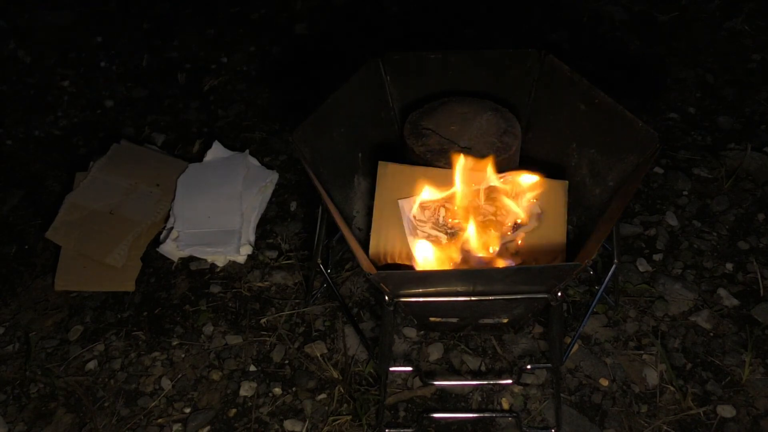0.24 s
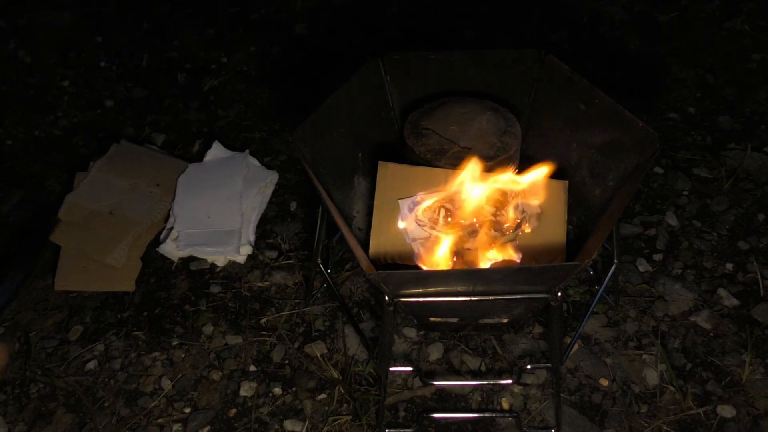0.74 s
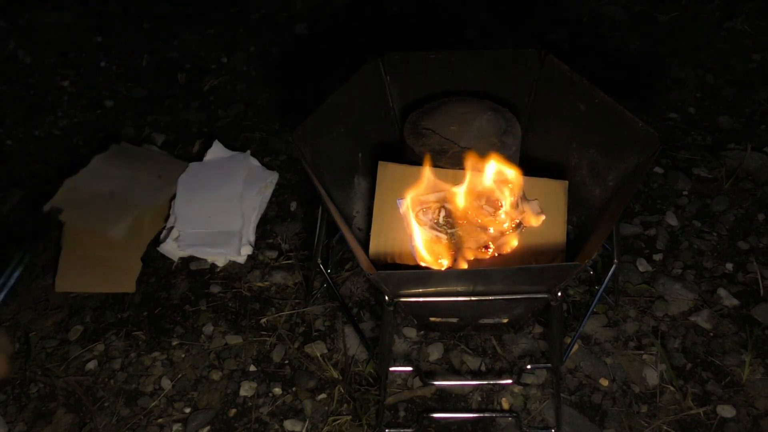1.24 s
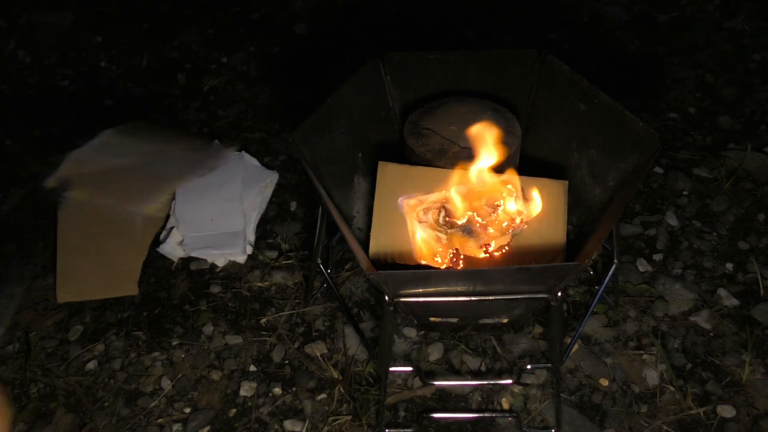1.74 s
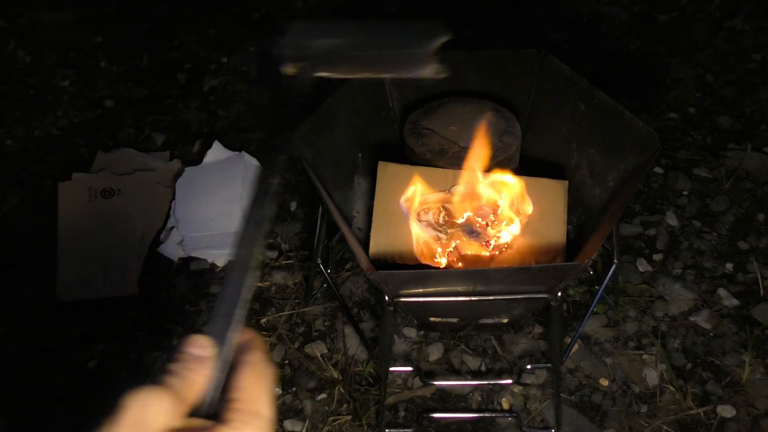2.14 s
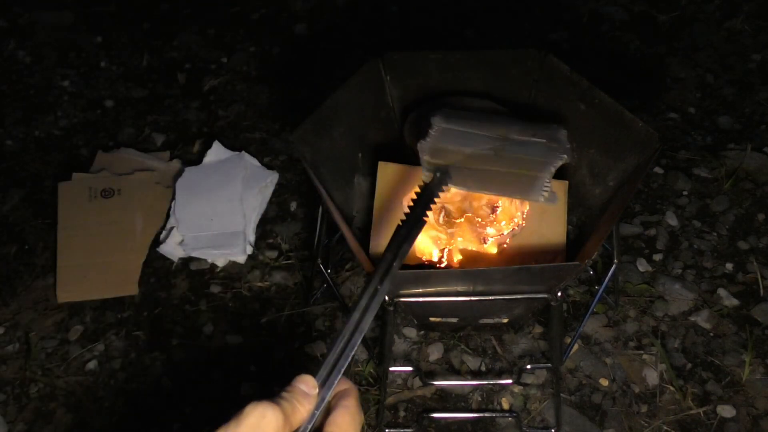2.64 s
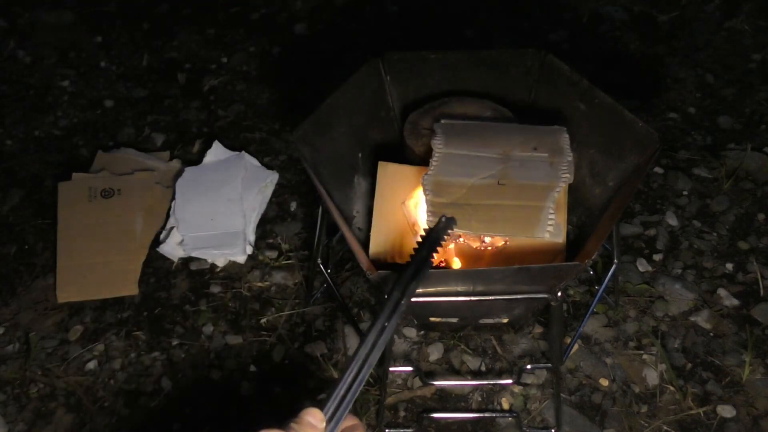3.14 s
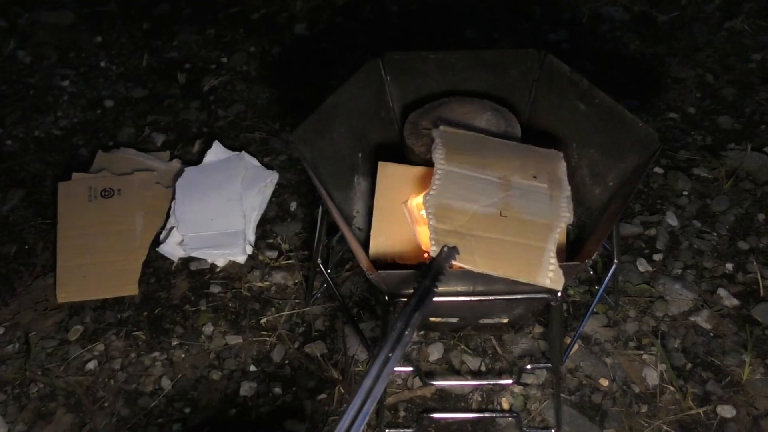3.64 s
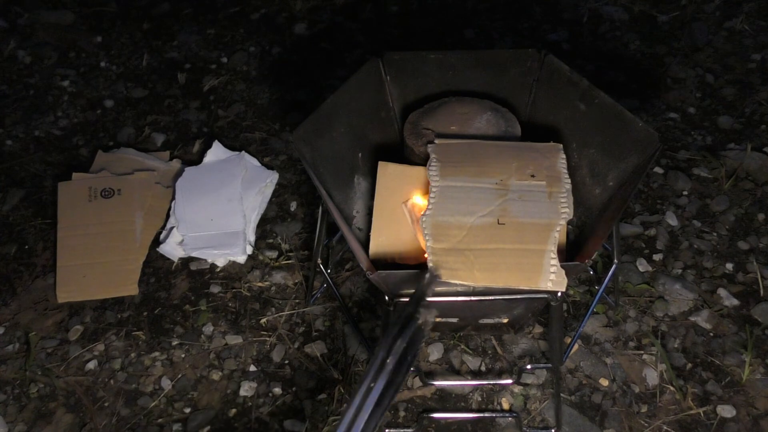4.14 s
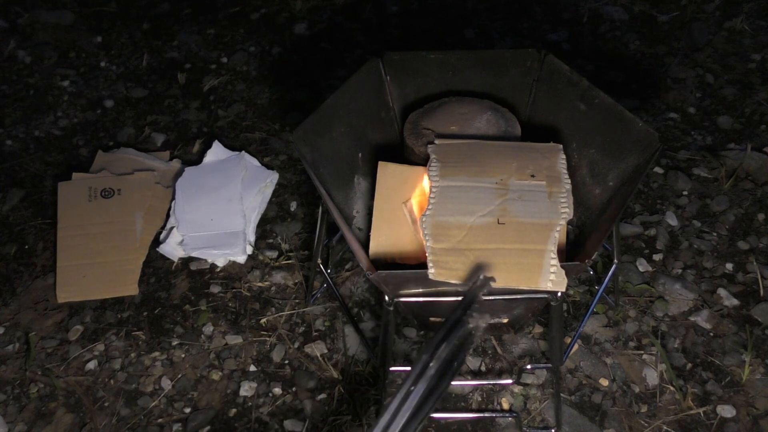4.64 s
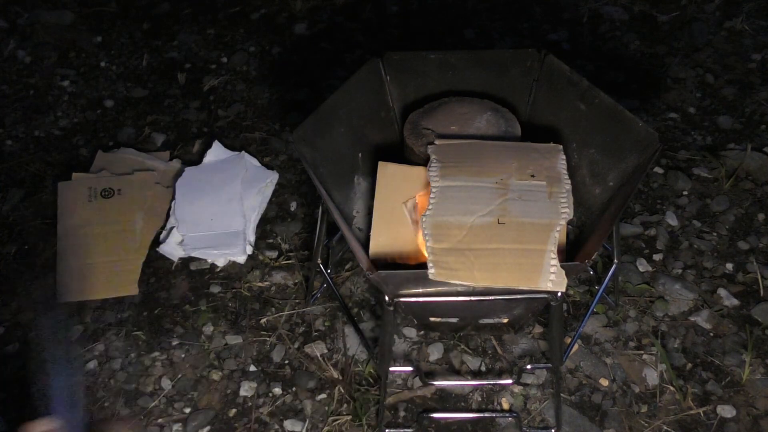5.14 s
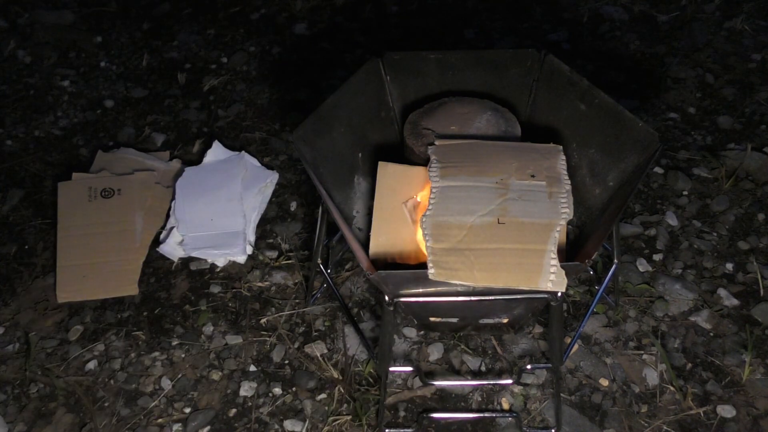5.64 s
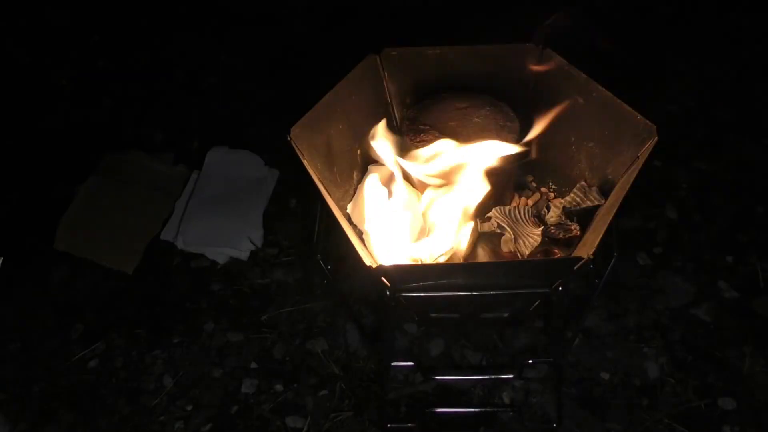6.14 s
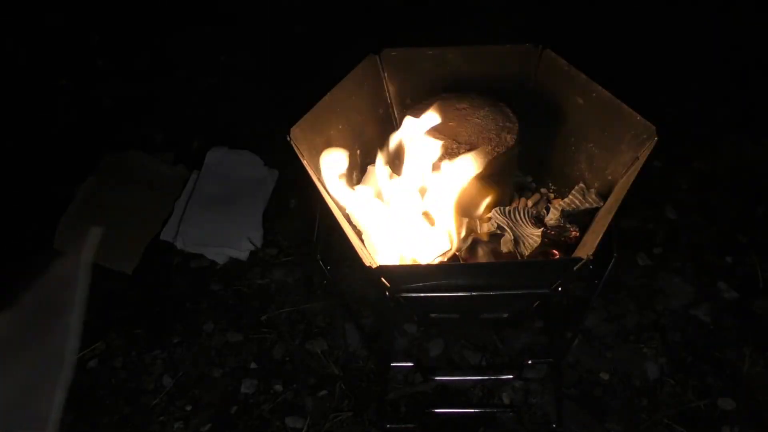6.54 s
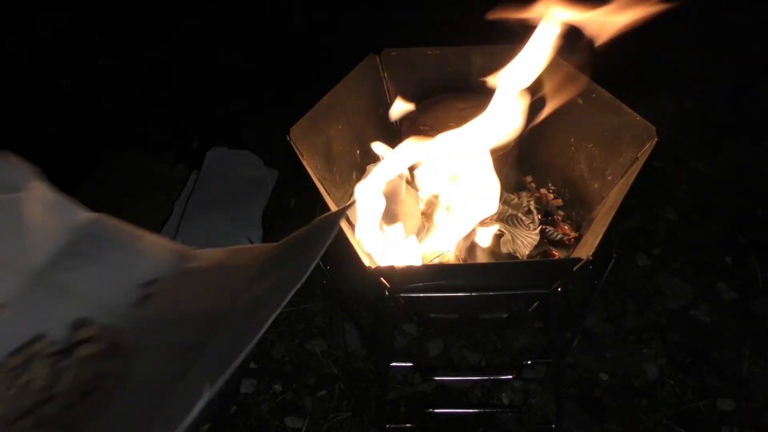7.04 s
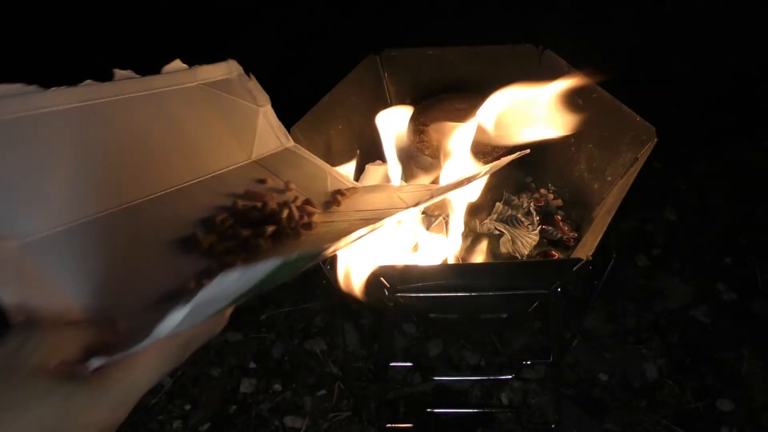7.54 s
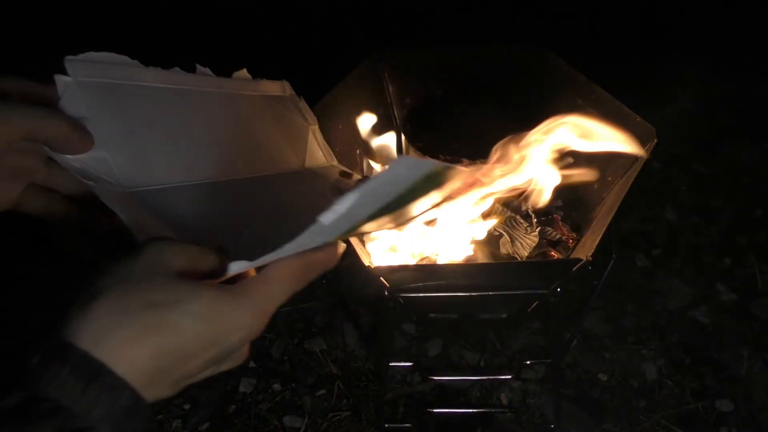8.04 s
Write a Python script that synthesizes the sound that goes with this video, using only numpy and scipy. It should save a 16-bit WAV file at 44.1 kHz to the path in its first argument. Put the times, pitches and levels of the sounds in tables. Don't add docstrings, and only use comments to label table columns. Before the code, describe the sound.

Outdoors at night, a dense, steady chorus of crickets shimmers over faint distant traffic and a low engine idle. Close by, cardboard rustles, is knocked by tongs, and steel scrapes lightly. After a tiny silent cut, a fire roars low, one cricket chirps in even phrases, and a card sheet flexes dully before pellets roll and tap off it with hard cracks and small metallic ticks. Close stereo microphones.

```python
import sys
import numpy as np
from scipy import signal
from scipy.io import wavfile
from scipy.ndimage import uniform_filter1d

SR = 44100
rng = np.random.default_rng(int(sys.argv[2]) if len(sys.argv) > 2 else 0)


def decibels_to_gain(level_db):
    exponent = np.asarray(level_db, float) / 20
    return 10 ** exponent


def log_audio(samples):
    frames = np.atleast_2d(samples).T
    limited = np.clip(frames, -1, 1)
    pcm = np.round(limited * 32767).astype(np.int16)
    wavfile.write(sys.argv[1], SR, pcm)


N = 365148
BREAK_START_S, BREAK_END_S = 6.1025, 6.1142


def evened(x):
    return x / np.sqrt(np.mean(x ** 2) + 1e-20)


def read(points, hz):
    f, value = np.transpose(points)
    return np.interp(np.log(hz + 1), np.log(f + 1), value)


def curve(rows, column=1):
    rows = np.array(rows)
    return np.interp(np.arange(N) / SR, rows[:, 0], rows[:, column])


def wander(per_s):
    knots = rng.standard_normal(400)
    return np.interp(np.arange(N) / SR * per_s, np.arange(400), knots) * np.sqrt(1.5)


def add(mix, s, sound):
    part = mix[:, round(s * SR):][:, :sound.shape[1]]
    part += sound[:, :part.shape[1]]


def resonate(x, hz, width_hz):
    turn = np.exp(2j * np.pi * np.cumsum(hz * np.ones(x.shape[-1])) / SR)
    r = np.exp(-np.pi * width_hz / SR)
    return 2 * (turn * signal.lfilter([1 - r], [1, -r], x / turn)).real


def dull(x, hz):
    sos = signal.butter(3, [170, min(hz, 20000)], "bandpass", fs=SR, output="sos")
    return signal.sosfilt(sos, x)


def ports(x, pan_db):
    x = x * np.ones((2, 1))
    right = np.append([0, 0], x[1, :-2])
    return np.array([x[0] * decibels_to_gain(pan_db / 2), right / decibels_to_gain(pan_db / 2)])


def taps(per_s, spread_db, apart):
    size = decibels_to_gain(spread_db * np.minimum(rng.exponential(1, (2, N)), 4))
    size = size * rng.choice([-1, 1], (2, N))
    clicks = size * (rng.random((2, N)) < per_s / SR) / np.sqrt(per_s)
    return clicks[0] + apart * clicks[1] * np.array([[1], [-1]])


# t/s, level/dB
ROAD_WASH = [(0.0, -52), (2.67, -52.5), (3.57, -56), (4.84, -56), (5.32, -53.5), (6.1, -57)]
# f/Hz, likeness/0-1
LIKENESS = [(60, .45), (200, .2), (600, .05), (1500, .2), (3800, .7), (4500, .72), (5200, .5), (6400, .5),
            (10000, .3), (15000, .25)]
# f/Hz, phase/rad
LEFT_LEAD = [(60, 0.), (1400, .4), (3900, .1), (4900, .7), (5500, .1), (7500, .8), (12000, 2.6),
             (15300, 4.)]
# f/Hz, level/dB
LEFT_LEAN = [(60, 0.3), (200, 0.6), (300, 0.8), (550, 3.2), (1100, 0.58), (2600, 2.1), (4500, 0.99),
             (9000, 2.6), (13000, 0.4)]


def wash(spectrum, level_db, patchy_db, road_share=0):
    frames, hz = N // 256 + 5, np.fft.rfftfreq(1024, 1 / SR)
    a, b, c, d, patches = rng.standard_normal((frames, 513, 5)).T
    patches = uniform_filter1d(patches, size=14, axis=0)
    patches = evened(uniform_filter1d(patches, size=12, axis=1))
    road_db = np.interp(np.arange(frames) * 256 / SR, *np.transpose(ROAD_WASH)) - ROAD_WASH[-1][1]
    hump = road_share * np.exp(-(np.log((hz + 1) / 1400) / 0.47) ** 2)
    same = np.clip(read(LIKENESS, hz), -1, 1)[:, None]
    lag = np.exp(-1j * read(LEFT_LEAD, hz))[:, None]
    left = a + 1j * b
    right = same * left * lag + np.sqrt(1 - same ** 2) * (c + 1j * d)
    lean = decibels_to_gain(read(LEFT_LEAN, hz) / 2)[:, None]
    shape = decibels_to_gain(read(spectrum, hz))[:, None]
    drift = decibels_to_gain(patchy_db * patches + np.outer(hump, road_db))
    z = np.array([left * lean, right / lean]) * shape * drift
    scale = np.sqrt(1.5 * np.sum(shape ** 2))
    return decibels_to_gain(level_db) * signal.istft(z, nperseg=1024, noverlap=768)[1][:, :N] / scale


def cricket(hz, effort_db):
    rate, length, pan, way = rng.random(4)
    chance = rng.standard_normal((400, 3))
    strokes_per_s = 21 + 12 * rate
    at = (np.cumsum(1 + .06 * chance[:, 0]) - rng.random()) / strokes_per_s * SR
    at = at[at < N].astype(int)
    size = decibels_to_gain(effort_db[at] + 2 * chance[:len(at), 1])[:, None]
    t = np.arange(round(min(0.015 + 0.014 * length, .027) * SR)) / SR
    turns = 2 * np.pi * hz * (t - 0.0065 * (t ** 2 / t[-1] - t)) + 10 * chance[:len(at), 2:]
    swell = np.sin(np.pi * t / t[-1]) ** 2
    lean_db = .6 + 2 * (pan - .5)
    right_lag = 0.77 + 1.9 * (way - .5)
    out = np.zeros((2, N + 2000))
    for port, lag, db in zip(out, (0, right_lag), (lean_db, -lean_db)):
        pulse = swell * np.sin(turns - lag)
        pulse += decibels_to_gain(-34.5) * swell ** 2 * np.sin(2 * (turns - lag))
        port[at[:, None] + np.arange(len(t))] = decibels_to_gain(db) * size * pulse
    return out[:, :N]


# f/Hz, level/dB
WING_PITCHES = [(3900, -38.5), (4050, -15), (4200, -6), (4330, 1.5), (4440, 0.5), (4500, 10.5), (4570, 3),
                (4680, 7.5), (4760, -2), (4830, 1.5), (4940, -6), (5010, -10.5), (5100, -9), (5250, -41.5)]
CHORUS_DB, CHORUS_LATER_DB = -28, -27
PHRASE_S, PERIOD_S, SING_S, EDGE_S, REST_DB = 6.4, .415, .18, .055, -15
SOLO_GAIN = .011


def chorus(count):
    t = np.arange(N) / SR
    later = t > BREAK_END_S
    pitches_hz = np.linspace(4120, 4980, count)
    near = sum(cricket(hz, read(WING_PITCHES, hz) + 3.2 * wander(5)) for hz in pitches_hz)
    crowd = decibels_to_gain(-1) * evened(near) + evened(wash(WING_PITCHES, 0, patchy_db=1.21))
    from_middle_s = abs((t - PHRASE_S - SING_S / 2 + PERIOD_S / 2) % PERIOD_S - PERIOD_S / 2)
    off_s = from_middle_s - SING_S / 2
    resting = np.where(t > PHRASE_S - EDGE_S, np.clip(off_s / EDGE_S, 0, 1), 1)
    solo = cricket(5130, np.where(later, REST_DB * resting, -9))
    level_db = np.where(later, CHORUS_LATER_DB, CHORUS_DB) + 0.8
    return evened(crowd) * decibels_to_gain(level_db) + SOLO_GAIN * solo


# f/Hz, density/dB per Hz
HISS_SPECTRUM = [(4900, -23), (5180, 3.5), (5320, 4), (5900, -5.5), (6850, -3.5), (7500, -8.5),
                 (8550, -14.5), (9000, -7.5), (9350, -12.5), (9480, -15), (9750, -28), (11000, -42),
                 (13300, -40), (15700, -27)]


def hiss():
    return wash(HISS_SPECTRUM, -53.5 + 0.11, patchy_db=0.98)


# f/Hz, density/dB per Hz
AIR_SPECTRUM = [(12, -43), (20, -10), (54, 0), (76, -7.5), (216, -8.5), (294, -13), (376, -7.5), (420, -15),
                (469, -15), (818, -16.5), (1190, -15), (3470, -28), (3790, -21.5), (4050, -19.5),
                (5260, -37.5), (8910, -120)]


def night_air():
    return wash(AIR_SPECTRUM, -40 + 0.033, patchy_db=0.79, road_share=1)


def engine(rows, fuzz_hz, smear, pan_db):
    hz = curve(rows)
    turns = 2 * np.pi * np.cumsum(hz) / SR
    fuzz = evened(resonate(rng.standard_normal((2, N)), hz, fuzz_hz))
    tone = decibels_to_gain(curve(rows, column=2)) * (np.sqrt(2) * np.sin(turns) + smear * fuzz)
    half = decibels_to_gain(curve(rows, column=3)) * np.sqrt(2) * np.sin(turns / 2)
    return tone * decibels_to_gain(np.array([[.5], [-.5]]) * pan_db) + half


# t/s, f/Hz, level/dB, half-order level/dB
IDLE_TONE = [(0.0, 52.89, -54.5, -76), (3.4, 53.17, -53, -83), (6.1, 51.9, -56.5, -80)]


def idle_engine():
    return engine(IDLE_TONE, fuzz_hz=6, smear=0.93, pan_db=.5)


# t of fastest moment/s, level/dB, rise/s, fall/s
MOVEMENTS = [
    (0.41, -44.5, 0.32, 1.4),
    (1.42, -44, .25, 1.5),
    (1.91, -39.5, 0.42, .9),
    (2.77, -49.5, .6, 0.34),
    (4.3, -53.5, 2.1, .2),
    (5.26, -41, .6, 0.7),
    (6.72, -37.5, 0.18, .5),
    (6.84, -33, .05, 0.11),
    (7.02, -42.5, .1, 10),
]
STILL_DB = -53.5


def rustle():
    t = np.arange(N) / SR
    fibres = taps(2500, spread_db=1.9, apart=1)
    moves = [db - 20 * np.maximum((s - t) / rise_s, (t - s) / fall_s) for s, db, rise_s, fall_s in MOVEMENTS]
    level_db = np.maximum(np.max(moves, axis=0), STILL_DB)
    crackle = evened(resonate(resonate(fibres, 2700, 2000), 3100, 1900))
    return ports(decibels_to_gain(level_db - 10) * crackle, 7.5)


def knock(db, hz, pan_db, treble_db, thump, overtones, contact_s, t60_s):
    t = np.arange(2600) / SR
    blow = rng.standard_normal(2600) * decibels_to_gain(-60 * np.maximum(t - contact_s, 0) / t60_s)
    blow[:3] += 6
    # f/Hz, width/Hz, share
    modes = [(hz, 450, 1), (1.55 * hz, 600, .65 * overtones), (2.2 * hz, 800, .45 * overtones),
             (2900, 1000, .2), (380, 350, thump)]
    body = 0
    for mode_hz, width_hz, share in modes:
        ring = resonate(resonate(blow, mode_hz, width_hz), mode_hz, 2 * width_hz)
        body = body + share * evened(ring)
    body = dull(body, 3040)
    top = resonate(resonate(blow, 6800, 2200), 6800, 2600)
    sound = decibels_to_gain(db) * body / abs(body).max() + decibels_to_gain(db + treble_db + 4) * top / abs(top).max()
    return ports(sound, pan_db)


# t/s, peak level/dB, body f/Hz, left-right level/dB
TONG_BLOWS = [
    (1.427, -26, 990, 5),
    (1.8954, -22.5, 755, 1.5),
    (1.91, -44, 740, 1),
    (1.917, -30, 646, 1),
]


def tongs(mix):
    for s, *blow in TONG_BLOWS:
        add(mix, s, knock(*blow, treble_db=-28, thump=.5, overtones=.7, contact_s=.0044, t60_s=.03))


def tick(db, hz, t60_s):
    t = np.arange(2000) / SR
    scrape = rng.standard_normal(2000) * decibels_to_gain(-60 * t / t60_s)
    ring = resonate(resonate(scrape, hz, 900), hz, 1500)
    ring += 0.42 * resonate(resonate(scrape, 7000, 3000), 7000, 3500)
    return ports(decibels_to_gain(db) * ring / abs(ring).max(), 2.6)


# t/s, peak level/dB, ring f/Hz
TONG_SCRAPES = [
    (1.893, -34.5, 8050),
    (2.6, -36, 7800),
    (2.69, -43, 7260),
    (2.76, -48.5, 7500),
    (2.852, -31.5, 5740),
    (2.86, -49, 7700),
    (3.11, -39.5, 7000),
    (3.17, -45, 7600),
    (3.51, -46, 6900),
]


def scrapes(mix):
    for s, *scrape in TONG_SCRAPES:
        add(mix, s, tick(*scrape, t60_s=.04))


# f/Hz, density/dB per Hz
BLAZE_SPECTRUM = [(12, -38), (20, -6), (43, -1), (74, -4.5), (108, -18.5), (145, 1), (173, -8), (420, -5.5),
                  (491, -13), (716, -14), (1460, -11.5), (3170, -27), (3710, -25), (4050, -14.5),
                  (5260, -48), (8910, -120)]


def blaze():
    return wash(BLAZE_SPECTRUM, -35 + 0.089, patchy_db=0.55)


# t/s, f/Hz, level/dB, half-order level/dB
PASSING_TONE = [(6.12, 145.0, -51, -50), (6.75, 144.2, -49.5, -49.5), (7.29, 143.9, -46.5, -46.5),
                (7.8, 142.5, -46.5, -59), (8.28, 139.5, -51, -58)]


def passing_engine():
    return engine(PASSING_TONE, fuzz_hz=3.2, smear=0.24, pan_db=-14.5)


# t/s, peak level/dB, body f/Hz, left-right level/dB
SHEET_FLEXES = [
    (6.274, -40, 342, 0.5),
    (6.454, -37, 433, -2.5),
    (6.541, -38, 423, -0.5),
    (6.777, -35, 377, -7),
    (6.835, -38, 369, -1.0),
    (6.93, -34, 425, -3),
    (7.015, -37, 350, -0.5),
    (7.114, -35, 347, 4),
]


def flexes(mix):
    for s, *bump in SHEET_FLEXES:
        add(mix, s, knock(*bump, treble_db=-45, thump=.3, overtones=.12, contact_s=.008, t60_s=.05))


# t/s, level/dB
FLOW = [(7.09, -44.5), (7.21, -42.5), (7.25, -35.5), (7.29, -43), (7.6, -41.5), (7.66, -32), (7.85, -31),
        (7.96, -26), (8.26, -28.5)]
# f/Hz, width/Hz, level/dB
SHEET_LOW_MODES = [(250, 990, -17.5), (458, 130, -1), (576, 260, -9), (850, 150, -5), (1150, 680, 5.5),
                   (1294, 590, 7)]
# f/Hz, width/Hz, level/dB
SHEET_HIGH_MODES = [(2035, 510, 24), (2540, 190, 15.6), (2800, 1270, 13.2), (3730, 1000, 10)]
RATTLE_DB, SURGE_DB, SURGES_PER_S = -6, 1.5, 18


def ring_sheet(hits, modes):
    return sum(decibels_to_gain(db) * resonate(resonate(hits, hz, width_hz), hz, 2 * width_hz) for hz, width_hz, db in modes)


def pour():
    thud_db = curve(FLOW) + SURGE_DB * wander(SURGES_PER_S)
    hits = taps(500 + 4000 * decibels_to_gain(thud_db - thud_db.max()), spread_db=3, apart=.2)
    low = ring_sheet(hits, SHEET_LOW_MODES)
    high = ring_sheet(hits, SHEET_HIGH_MODES)
    grit = resonate(resonate(hits, 5400, 2800), 7800, 3300)
    rattle = evened(dull(high, 3900)) + decibels_to_gain(-22) * evened(grit)
    rolling = np.clip((np.arange(N) / SR - FLOW[0][0]) / 0.036, 0, 1)
    sound = decibels_to_gain(thud_db + 1.7) * evened(dull(low, 2380)) + decibels_to_gain(thud_db + RATTLE_DB + 5) * rattle
    return ports(rolling * sound, 1.9)


# t/s, peak level/dB, body f/Hz, left-right level/dB
PELLET_DROPS = [(7.116, -25.5, 832, 8), (7.138, -29, 800, 4), (7.152, -30, 850, 4), (7.177, -26.5, 1100, 5),
                (7.241, -21, 1230, 2), (7.251, -34, 1280, 6.5), (7.267, -20.5, 850, 4),
                (7.29, -22.5, 1180, -1), (7.317, -29, 993, -2), (7.41, -22, 1150, -3),
                (7.469, -38, 2040, -3), (7.489, -45, 1300, 0.6), (7.585, -33, 1175, 8),
                (7.636, -18, 1075, 6), (7.667, -26, 1230, 6), (7.701, -13.5, 1120, 4),
                (7.73, -13.5, 1330, 2), (7.787, -49, 1180, 1.5), (7.94, -14, 1380, 2.1),
                (8.004, -21, 1090, 7), (8.1, -15, 1190, 1.5), (8.236, -14, 1900, 7), (8.245, -27, 970, -1)]


def pellets(mix):
    for s, *blow in PELLET_DROPS:
        add(mix, s, knock(*blow, treble_db=-26, thump=.2, overtones=1, contact_s=.0034, t60_s=.016))


# t/s, peak level/dB, body f/Hz, left-right level/dB
HARD_DROPS = [
    (7.354, -16.5, 860, 5),
    (7.377, -26, 1690, 0),
    (7.3904, -10.5, 920, 6),
    (7.5482, -12, 1130, 3),
    (7.896, -17, 1900, 6),
]


def hard_pellets(mix):
    for s, *blow in HARD_DROPS:
        add(mix, s, knock(*blow, treble_db=-25, thump=.05, overtones=1, contact_s=.0036, t60_s=.014))


# t/s, peak level/dB, ring f/Hz
STEEL_PINGS = [
    (7.648, -33, 6074),
    (7.725, -33, 6600),
    (7.738, -34, 7000),
    (7.748, -36, 6700),
    (7.852, -37, 6500),
    (7.896, -32, 7050),
    (8.19, -46, 11000),
    (8.236, -26, 6370),
    (8.238, -41, 12500),
]


def pings(mix):
    for s, *ping in STEEL_PINGS:
        add(mix, s, tick(*ping, t60_s=.013))


def scene():
    later = np.arange(N) > BREAK_END_S * SR
    before = night_air() + idle_engine()
    after = blaze() + passing_engine()
    mix = chorus(count=60) + hiss() + np.where(later, after, before) + rustle() + pour()
    for play in (tongs, scrapes, flexes, pellets, hard_pellets, pings):
        play(mix)
    return mix


def top_cut(x):
    return signal.sosfilt(signal.butter(12, 15730, fs=SR, output="sos"), x)


def record(dry):
    t = np.arange(N) / SR
    outside_s = np.maximum(BREAK_START_S - t, t - BREAK_END_S)
    mix = dry * np.clip(outside_s / .0005, 0, 1)
    return top_cut(mix)


dry = scene()
out = record(dry)
log_audio(out)
```